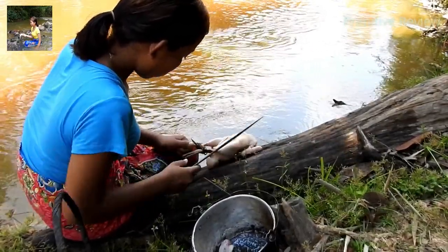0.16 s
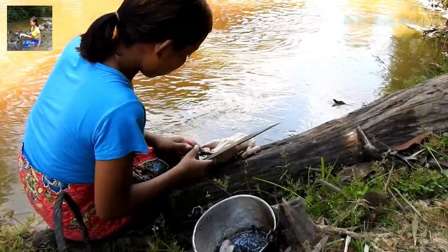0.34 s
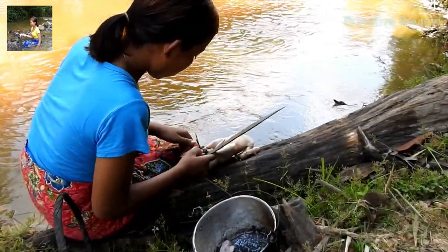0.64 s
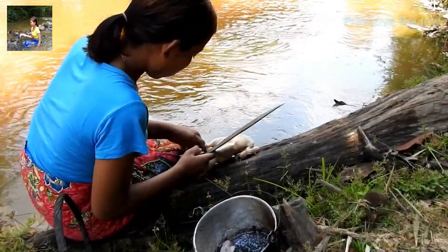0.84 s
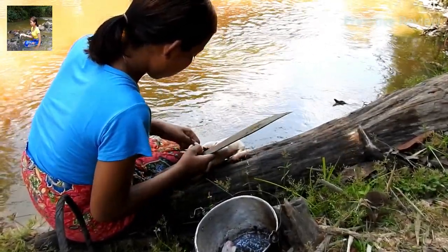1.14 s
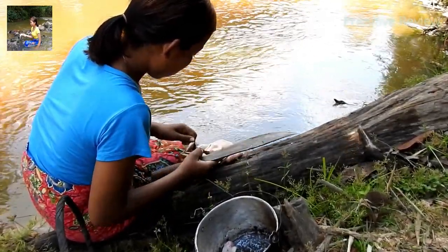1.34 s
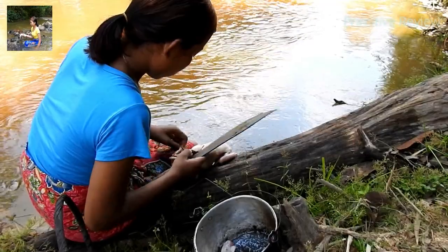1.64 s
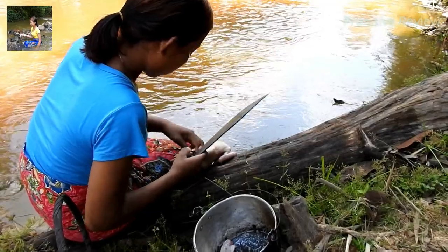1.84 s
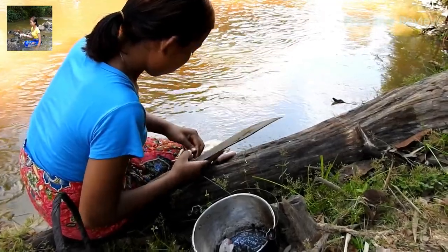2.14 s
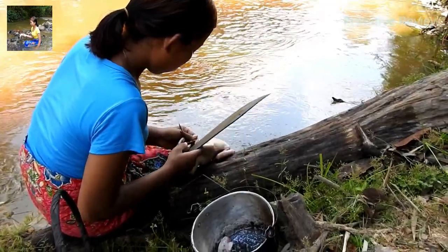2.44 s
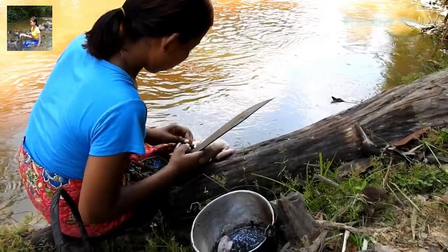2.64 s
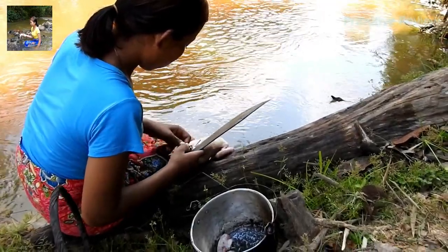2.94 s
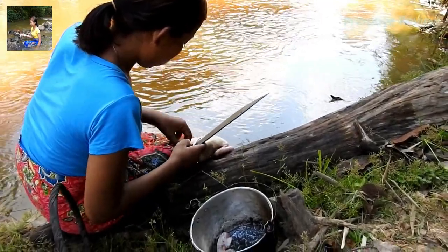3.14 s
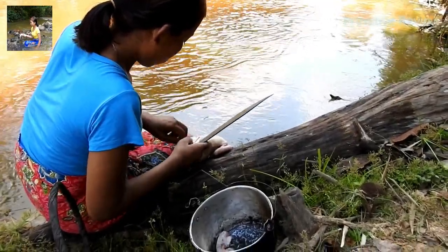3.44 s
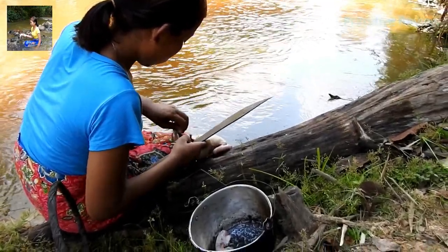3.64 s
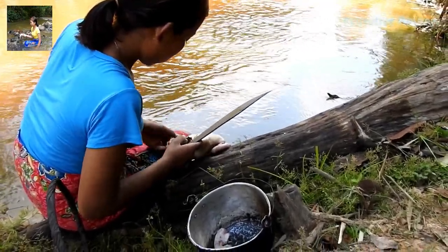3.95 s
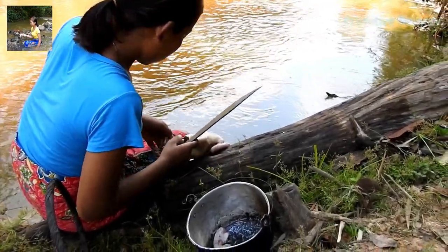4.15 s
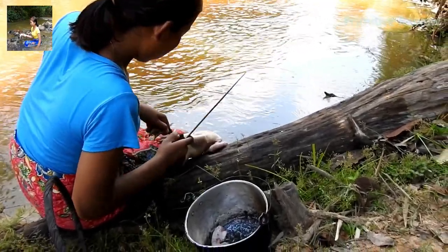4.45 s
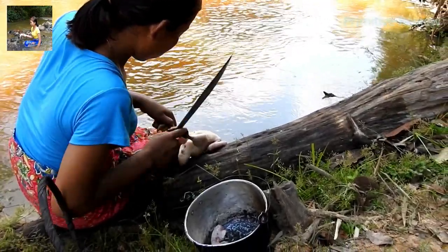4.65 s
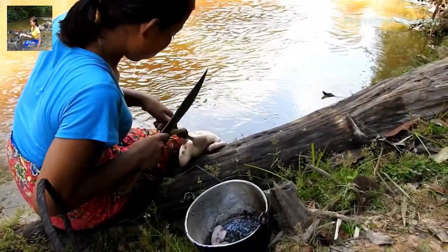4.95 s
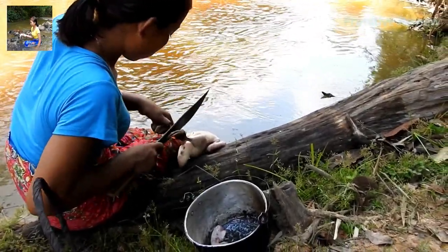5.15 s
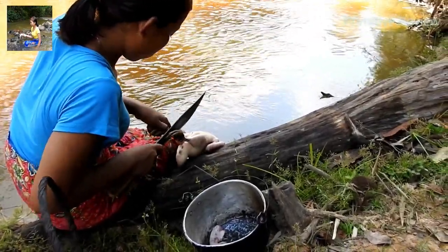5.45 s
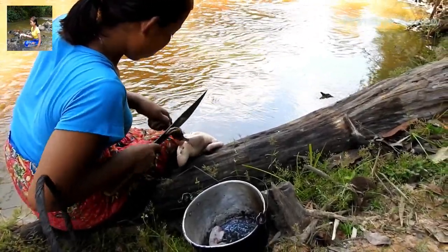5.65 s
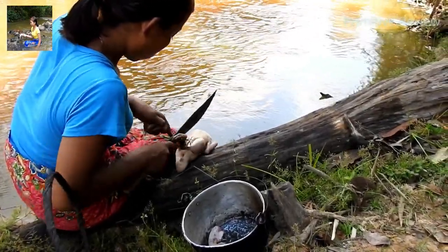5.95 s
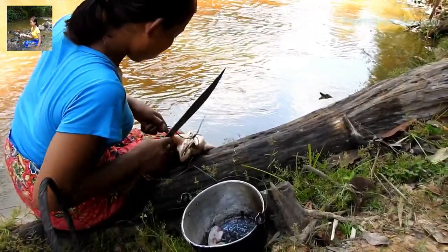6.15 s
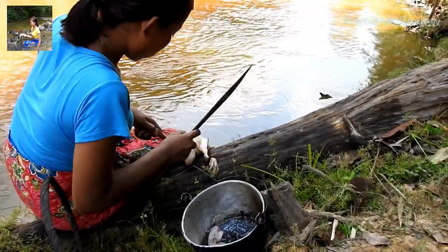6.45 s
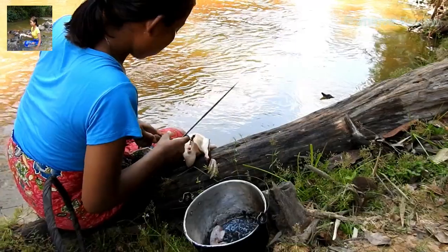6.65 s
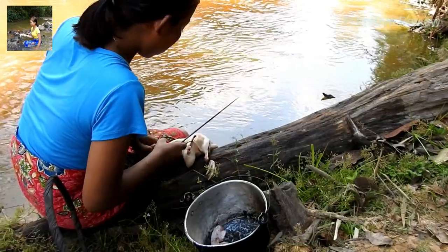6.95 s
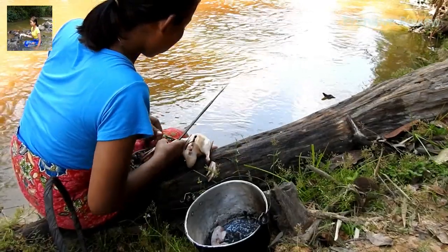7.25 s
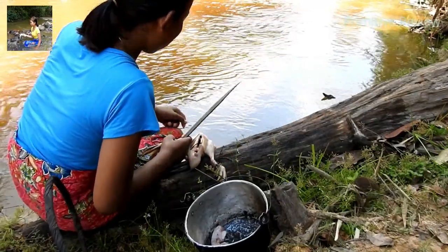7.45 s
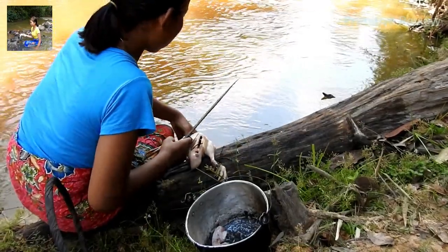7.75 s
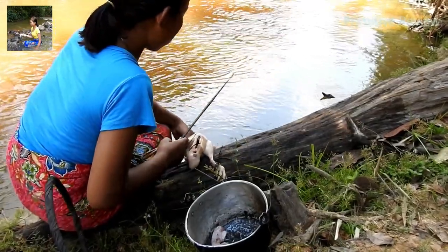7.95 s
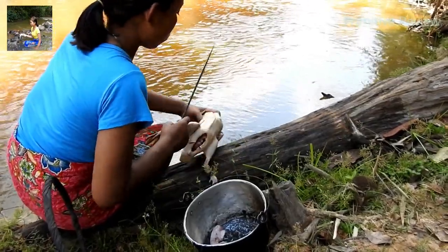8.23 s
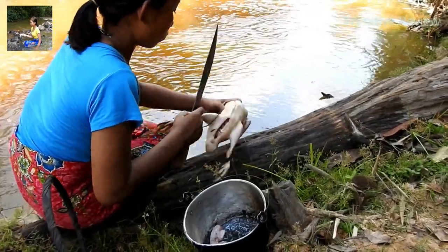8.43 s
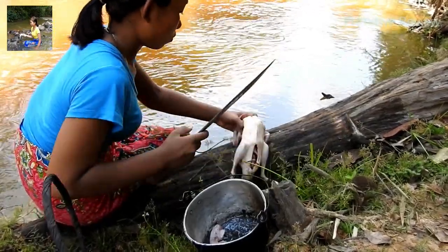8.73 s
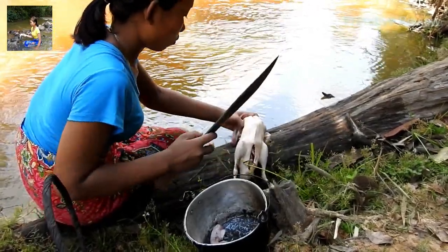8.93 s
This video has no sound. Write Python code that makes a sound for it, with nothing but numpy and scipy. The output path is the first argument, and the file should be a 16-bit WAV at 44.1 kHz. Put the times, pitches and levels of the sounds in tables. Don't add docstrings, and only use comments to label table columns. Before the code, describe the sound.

A high, piercing cicada drone dominates throughout, fluttering about twelve times a second. Close by, hands and a large knife make faint wet rustles and small ticks on bone. A brief bird whistle rises near three seconds. Sharp scrapes come around six, dull log knocks near 7.6 and 8.7, with low wind thumps in the second half. Open riverbank, stereo microphone without much wind protection.

```python
import sys
import numpy as np
from scipy import signal
from scipy.fft import rfft, irfft, next_fast_len
from scipy.io import wavfile
from scipy.ndimage import uniform_filter1d

SR = 44100
rng = np.random.default_rng(int(sys.argv[2]) if len(sys.argv) > 2 else 0)


def store_wav(level_fs):
    pcm = np.round(np.clip(np.atleast_2d(level_fs), -1, 1) * 32767)
    wavfile.write(sys.argv[1], SR, pcm.T.astype(np.int16))


def attenuation_scalar(level_db):
    decades = np.asarray(level_db, float) / 20
    return 10 ** decades


N = 400861


def rms_one(x):
    return x / np.sqrt(np.mean(np.abs(x) ** 2) + 1e-20)


def in_time(rows, lead=0):
    s, *columns = np.transpose(rows)
    t = np.arange(-lead, N) / SR
    return [np.interp(t, s, column) for column in columns]


def faded(rows, fade_s):
    start, end = rows[0][0], rows[-1][0]
    return in_time([(start - fade_s, 0), (start, 1), (end, 1), (end + fade_s, 0)])[0]


def at_hz(points, hz):
    point_hz, values = np.transpose(points)
    return np.interp(np.log(hz), np.log(point_hz), values)


def panned(x, pan_db):
    left, right = attenuation_scalar(pan_db / 2), attenuation_scalar(-pan_db / 2)
    return np.array([x * left, x * right]) / np.sqrt((left ** 2 + right ** 2) / 2)


def drift(rate_hz):
    step, settle = 40, 2000
    r = np.exp(-2 * np.pi * rate_hz * step / SR)
    slow = signal.lfilter([1], [1, -2 * r, r * r], rng.standard_normal(N // step + settle + 2))
    slow = rms_one(slow[settle:])
    return np.interp(np.arange(N) / step, np.arange(len(slow)), slow)


def band(x, low_hz, high_hz, order=2):
    return signal.sosfilt(signal.butter(order, [low_hz, high_hz], "band", fs=SR, output="sos"), x)


def highpass(x, hz, order):
    return signal.sosfilt(signal.butter(order, hz, "high", fs=SR, output="sos"), x)


def coloured(spectrum, alike):
    size = next_fast_len(N)
    hz = np.maximum(np.fft.rfftfreq(size, 1 / SR), 1)
    mid, side = rfft(rng.standard_normal((2, size))) * attenuation_scalar(at_hz(spectrum, hz))
    share = np.clip(at_hz(alike, hz), 0, 1)
    mid, side = np.sqrt(1 + share) * mid, np.sqrt(1 - share) * side
    return rms_one(irfft(np.array([mid + side, mid - side]), size)[:, :N])


def evened(x):
    return x / np.sqrt(uniform_filter1d(x ** 2, size=SR // 3))


def steadied(x):
    turn = np.array([[1, 1], [1, -1]]) / np.sqrt(2)
    return evened(turn @ evened(turn @ x))


def swells(start_s, hold_s, level_db, rise, fall):
    t = np.arange(0, N + 64, 64)[:, None] / SR
    early_s = np.maximum(start_s - t, 0)
    late_s = np.maximum(t - start_s - hold_s, 0)
    db = level_db - rise * early_s - fall * late_s
    return np.interp(np.arange(N) / SR, t[:, 0], np.sqrt(np.sum(attenuation_scalar(2 * db), axis=1)))


def struck(events, rise_cycles=0.67):
    out, t = np.zeros(N + SR), np.arange(SR // 4) / SR
    for s, peak_db, hz, t60_s, noisy in events:
        hiss = rms_one(band(rng.standard_normal(len(t)), hz / 1.7, min(hz * 1.06, .45 * SR)))
        body = (1 - noisy) * np.sin(2 * np.pi * hz * t) + noisy * hiss
        decay = attenuation_scalar(peak_db - 60 * t / max(t60_s, .003))
        attack = np.minimum(t * hz / rise_cycles, 1)
        out[round(s * SR):][:len(t)] += decay * body * attack
    return out[:N]


# time in seconds, level of the fifth partial in dB, left over right in dB.
CICADA = [(0, -41, 3.5), (.7, -41, 1), (1.5, -40, 0), (2.2, -43.5, -1), (3.1, -40, 5), (4.4, -40.5, -2.5),
          (5.2, -41, 2.5), (6.1, -41, 2), (7, -41, 3), (8.3, -39.5, 3.5), (9.09, -41, -0.5)]
# time in seconds, warble cycles ahead of a steady beat, highest click rate in Hz.
WARBLE = [(0, -.27, 1548), (1.2, -.3, 1548), (2.4, -.22, 1546), (3, -.03, 1543), (3.9, -.09, 1543),
          (5.3, .06, 1544), (6.4, -.02, 1543), (7.4, .11, 1542), (9.09, .14, 1542)]
# partial number, direct level in dB, echoed level in dB.
PARTIALS = [
    (5, -10.5, -9),
    (6, -53, -38.5),
    (7, -49.5, -55.5),
]


def cicada(echoes=12):
    warble_hz, dip_hz = 12.33, 41
    lead = SR // 4
    ahead, top_hz = in_time(WARBLE, lead)
    cycle = (warble_hz * np.arange(-lead, N) / SR + ahead) % 1
    dip = uniform_filter1d((1 - np.abs(2 * cycle - 1)) ** 1.9, size=400)
    phase = 2 * np.pi * np.cumsum(top_hz - dip_hz * dip) / SR

    fourth = np.exp(4j * phase)
    direct = fourth * attenuation_scalar(-18) * .62
    late = fourth * attenuation_scalar(-18) * attenuation_scalar(-5)
    for partial, direct_db, echoed_db in PARTIALS:
        tone = np.exp(1j * round(partial) * phase)
        direct = direct + attenuation_scalar(direct_db) * tone
        late = late + attenuation_scalar(echoed_db) * tone

    lags_s = np.minimum(.004 + .05 * rng.exponential(1, (2, echoes)), .24)
    lags = (lags_s * SR).astype(int)
    out = np.zeros((2, N))
    for side in range(2):
        sway = np.exp(1j * (1.3 * side + .6 * drift(1.2)))
        out[side] = (direct[lead:] * attenuation_scalar(1.5 * drift(2.5)) * sway).real
        for lag in lags[side]:
            leaf = drift(0.99) + 1j * drift(0.89)
            out[side] += (late[lead - lag:][:N] * leaf).real / np.sqrt(2 * echoes)

    lower = band(out, 5900, 6400, order=4)
    upper = highpass(out, 6900, 6)
    voice = steadied(upper) + attenuation_scalar(-27.5) * evened(lower)
    fifth_db, pan_db = in_time(CICADA)
    return voice * panned(attenuation_scalar(fifth_db + 6.0 + 0.96 * drift(5.9)), pan_db)


# start in seconds, hold in seconds, bright level in dB, dull level in dB.
STROKES = [(0, 0.016, -73, -82), (0.464, 0.029, -81, -63), (1.097, 0.022, -83, -62),
           (1.61, 0.041, -78, -61.5), (2.0, 0.014, -82, -74), (2.173, 0.13, -72, -67.5),
           (2.427, .02, -82, -64), (2.526, .03, -68, -66), (3.123, 0.12, -76, -69.5),
           (3.36, 0.081, -74, -64.5), (3.6, 0.9, -87, -73), (5.25, 0.16, -85, -73), (5.87, 0.018, -57, -63),
           (5.934, 0.025, -51.5, -56), (6.042, 0.011, -64, -60), (7.085, .02, -58, -63.5),
           (8.493, 0.044, -72, -68), (8.732, .01, -60, -63), (8.803, 0.032, -61, -61.5),
           (9.047, 0.041, -62, -81)]


def rustle():
    s, hold_s, *levels = np.transpose(STROKES)
    bright, dull = (swells(s, hold_s, db, rise=305, fall=232) for db in levels)
    clumps_db = 3.34 * np.minimum(rng.exponential(1, N), 5) + 3.2 * drift(60)
    grains = rng.standard_normal(N) * attenuation_scalar(clumps_db)
    bright_part = bright * attenuation_scalar(5) * rms_one(band(grains, 4430, 7500))
    return bright_part + dull * rms_one(band(grains, 750, 4200))


# time in seconds, peak in dB, pitch in Hz.
TICKS = [(.4994, -46, 5200), (0.5678, -42, 1100), (1.1644, -59, 5070), (1.64, -49, 2656),
         (1.701, -43, 1140), (2.155, -41.5, 2750), (2.1668, -35, 5500), (2.1667, -43, 4250),
         (2.4364, -50, 3820), (2.6998, -46, 3760), (3.1934, -40.5, 2430), (3.204, -41, 5770),
         (3.204, -43, 4300), (3.3994, -51, 3760), (4.1653, -42.5, 1030), (4.1944, -54, 5400),
         (5.3294, -56, 5100), (5.396, -41, 5400), (5.9389, -36, 5240), (5.967, -37, 5360),
         (6.0354, -40, 5440), (6.5134, -50, 5120), (7.6144, -58, 1300), (8.4894, -47, 3790),
         (8.7373, -42, 5730), (8.7375, -44, 4450), (8.8704, -51, 5570)]


def ticks():
    events = []
    for s, peak_db, hz in TICKS:
        t60_s = .011 + 5.0 / hz
        noisy = np.clip(.62 - .015 * (peak_db + 47), .1, .9)
        events.append((s, peak_db, hz, t60_s, noisy))
    return struck(events)


# time in seconds, peak in dB, pitch in Hz, seconds to fall by 60 dB, noisy share from 0 to 1.
KNOCKS = [(2.903, -50, 900, 0.037, 0.8), (2.903, -43.5, 164, 0.18, 0.6), (2.903, -45.5, 252, 0.12, 0.23),
          (3.07, -48.5, 223, 0.24, 0.38), (4.162, -49.5, 169, 0.39, 0.3), (7.612, -28, 329.5, 0.029, 0.7),
          (7.613, -42, 710, 0.03, 0.8), (7.658, -44, 650, 0.033, 0.75), (7.682, -42, 480, 0.032, 0.4),
          (8.722, -34, 323, 0.054, 0.45), (8.723, -31.5, 632, 0.047, 0.16)]


def knocks():
    return struck(KNOCKS, rise_cycles=2.9)


# time in seconds, peak in dB, pitch in Hz, seconds to fall by 60 dB, noisy share from 0 to 1.
CRACKS = [(3.4, -58, 11000, 0.0099, .9), (5.4819, -41, 5260, .025, .1), (5.874, -41, 5300, .025, 0.3),
          (5.897, -49, 5300, .025, .15), (5.91, -62, 11500, .03, .9), (5.93, -53, 12000, .03, .9),
          (5.945, -44, 11000, .015, 1), (6.04, -37, 10030, 0.11, 0), (8.738, -41, 10500, .007, 1),
          (8.738, -48, 12500, .008, 0.9), (8.82, -47, 8850, .05, 0.8)]


def cracks():
    return struck(CRACKS)


# start in seconds, hold in seconds, level in dB, left over right in dB.
GUSTS = [(4.725, 0.017, -60, 18), (4.86, 0.36, -58.5, 7), (5.183, 0.11, -45.5, 10), (5.341, 0.18, -36.5, 6),
         (5.576, 0.07, -36.5, -5), (5.732, .13, -34, -15), (5.94, 0.23, -48.5, 12),
         (6.337, 0.015, -47.5, 15), (6.456, .05, -49, 10), (6.546, 0.13, -52.5, 9),
         (6.811, 0.0058, -45.5, -6), (6.915, .01, -47.5, 16), (6.993, 0.0077, -42.5, -7),
         (7.097, 0.03, -45.5, 2), (7.195, 0.19, -40.5, 22), (7.527, 0.11, -41, 22), (7.618, 0.055, -31, 19),
         (7.735, .1, -42.5, 3), (7.872, 0.16, -56.5, 8), (8.108, 0.018, -50.5, 14), (8.222, .1, -48, 20),
         (8.39, 0.13, -49.5, 16), (8.618, 0.031, -32.5, 18), (8.716, 0.32, -42, -2)]
# frequency in Hz, strength in dB per Hz.
WIND_COLOUR = [(15, -50), (30, -14), (55, 16.5), (110, 12), (180, -4), (230, -12), (300, -45), (500, -53)]


def wind():
    s, hold_s, level_db, pan_db = np.transpose(GUSTS)
    port_db = 20 * np.log10(panned(attenuation_scalar(level_db), pan_db))
    lumps = attenuation_scalar([4.5 * drift(25), 4.5 * drift(25)])
    gusts = lumps * coloured(WIND_COLOUR, [(20, .05), (400, 0.027)])
    gusts = gusts / np.sqrt(uniform_filter1d(gusts ** 2, size=SR // 16))
    return gusts * [swells(s, hold_s, db, rise=348, fall=261) for db in port_db]


# time in seconds, peak in dB, pitch in Hz, left over right in dB.
PUFFS = [(5.418, -29, 75, 6), (5.509, -29, 102, 11), (5.758, -34, 78, -10), (5.799, -28, 114, -21),
         (5.845, -24.5, 111, -12), (7.306, -30.5, 83.5, 28), (7.38, -23, 93, 36), (7.61, -18.5, 121, 27),
         (7.655, -20, 113, 33), (7.679, -22.5, 134, 30), (8.634, -24.5, 103, 14)]


def puffs():
    before = SR // 32
    out, t = np.zeros((2, N + SR)), np.arange(-before, SR // 16) / SR
    for s, peak_db, hz, pan_db in PUFFS:
        cycles = t * hz - .7
        swing = np.exp(-(cycles / 0.43) ** 2) * np.cos(2 * np.pi * cycles)
        out[:, round(s * SR) - before:][:, :len(t)] += panned(attenuation_scalar(peak_db + 1) * swing, pan_db)
    return out[:, :N]


# time in seconds, pitch in Hz, level in dB.
BIRD = [
    (2.81, 4300, -66),
    (2.84, 4080, -66),
    (2.865, 4300, -67),
    (2.9, 4910, -63),
    (2.94, 5430, -60),
    (2.97, 5570, -61),
    (3.0, 5700, -72),
]


def bird():
    hz, level_db = in_time(BIRD)
    note = attenuation_scalar(level_db + 2.5) * faded(BIRD, 0.011) * np.sin(2 * np.pi * np.cumsum(hz) / SR)
    t = np.arange(SR // 4) / SR
    trees = rng.standard_normal(len(t)) * attenuation_scalar(-26 - 60 * t / 0.36)
    return note + signal.fftconvolve(note, trees)[:N]


# time in seconds, firing rate in Hz, its level in dB, level of its double in dB.
MOTOR = [(0, 68.86, -57, -69.5), (1.2, 69.2, -63, -63.5), (1.6, 70, -63.5, -83), (2.4, 70.85, -62.5, -66),
         (2.9, 69.8, -65, -66), (3.4, 70.8, -65, -71.5), (4.2, 70.6, -67, -71), (5.1, 71.7, -61.5, -76)]


def motor():
    hz, first_db, second_db = in_time(MOTOR)
    phase = 2 * np.pi * np.cumsum(hz) / SR
    first = attenuation_scalar(first_db + 3 + 1.5 * drift(3)) * np.sin(phase)
    second = attenuation_scalar(second_db + 3 * drift(3)) * np.sin(2 * phase)
    return panned((first + second) * faded(MOTOR, 0.58), 0.21)


# pitch in Hz, width in Hz, level in dB.
FAR_INSECTS = [(5120, 33, -71.5), (824.5, 10.4, -80.5), (5950, 110, -65), (6240, 220, -66),
               (7600, 140, -81)]


def far_insects():
    out = np.zeros((2, N))
    for hz, width_hz, db in FAR_INSECTS:
        noise = rng.standard_normal((2, N))
        out += attenuation_scalar(db) * rms_one(band(noise, hz - width_hz / 2, hz + width_hz / 2))
    return out


# time in seconds, level in dB.
WATER = [(0, -66), (.5, -65), (2.7, -63), (3.1, -65), (4.5, -63.5), (5.1, -76.5), (9.09, -78)]
# frequency in Hz, left-right likeness (1 is identical); the open air shares it.
LIKENESS = [(60, 0.74), (180, 0.5), (550, 0.59), (1650, 0.63), (4970, 0.57), (15000, -0.18)]


def water():
    colour = [(150, 3), (350, 0.0), (1100, -4.0), (2200, -25)]   # Hz, dB per Hz
    level_db = in_time(WATER)[0] - 2 + 3.26 * drift(38)
    return attenuation_scalar(level_db) * coloured(colour, LIKENESS)


# frequency in Hz, strength in dB per Hz.
FLOOR = [(24, -29), (40, -15.5), (80, -8.5), (300, -25), (1960, -29.5), (3900, -28), (4300, -27),
         (5200, -21.5), (7300, -15.5), (8300, -21.5), (9400, -38), (9800, -81), (12500, -62), (15000, -84)]


def air():
    return attenuation_scalar(-54.5 + 0.8 * drift(7.0)) * coloured(FLOOR, LIKENESS)


def scene():
    hands = rustle() + ticks() + knocks() + cracks()
    near = cicada() + panned(hands, 1.0) + wind() + puffs()
    return near + panned(bird(), 1.5) + motor() + far_insects() + water() + air()


def top_cut(x):
    return signal.sosfilt(signal.butter(12, 15710, fs=SR, output="sos"), x)


def record(dry):
    dry = highpass(dry, 38, 2)
    image_step_hz = 48000 - 44100
    turn = np.exp(2j * np.pi * image_step_hz * np.arange(N) / SR)
    loud_tones = band(dry, 7170, 8140) + attenuation_scalar(-21) * band(dry, 6050, 6100)
    treble = signal.hilbert(loud_tones, next_fast_len(N))[:, :N]
    images = treble * (attenuation_scalar(-28.5) / turn + attenuation_scalar(-34.5) * turn + attenuation_scalar(-45.5) * turn ** 2)
    return top_cut(dry + images.real)


dry = scene()
out = record(dry)
store_wav(out)
```